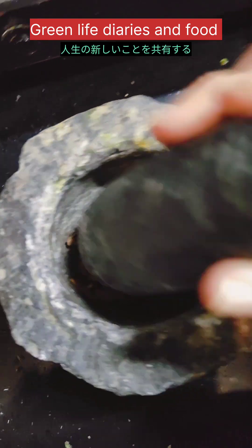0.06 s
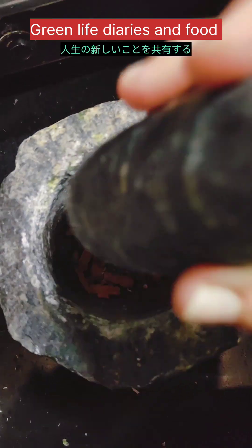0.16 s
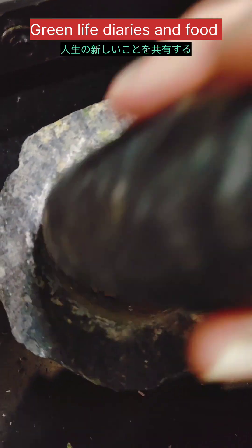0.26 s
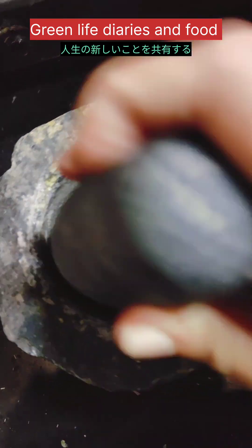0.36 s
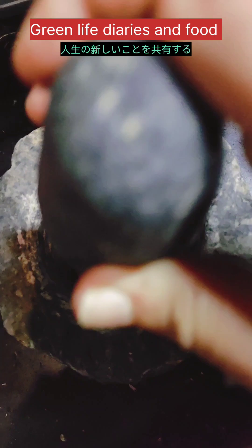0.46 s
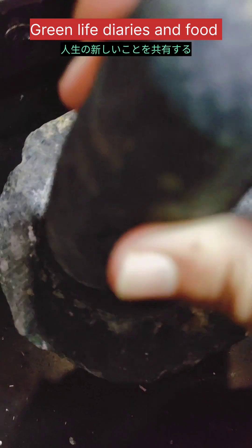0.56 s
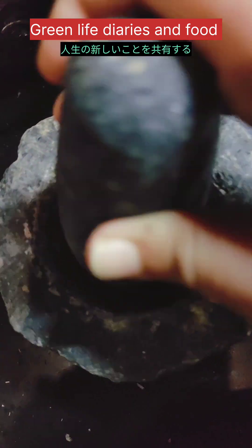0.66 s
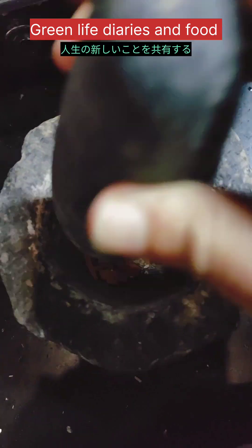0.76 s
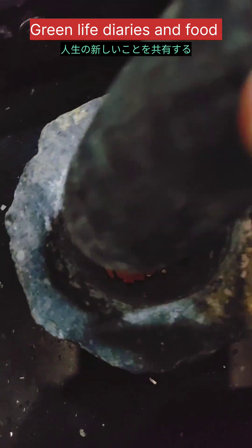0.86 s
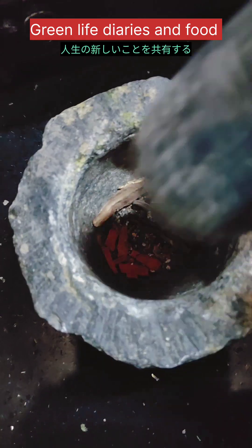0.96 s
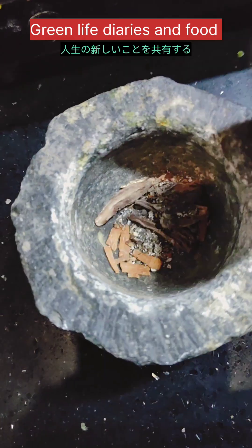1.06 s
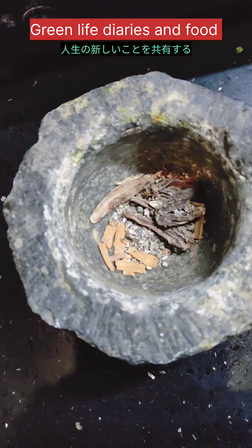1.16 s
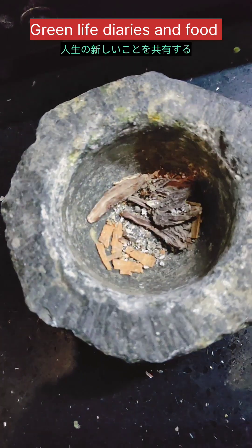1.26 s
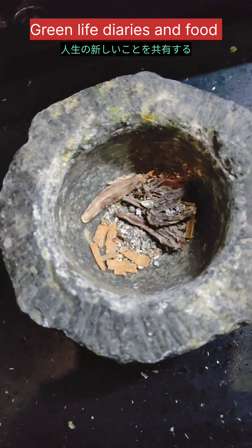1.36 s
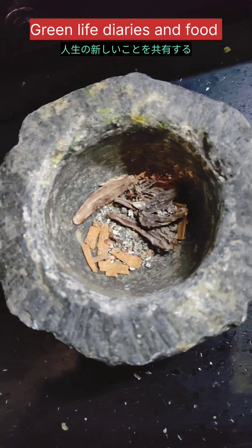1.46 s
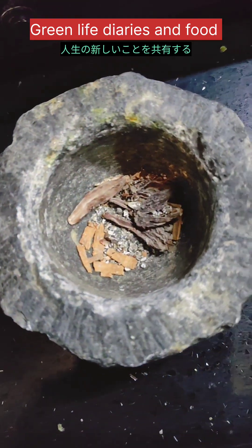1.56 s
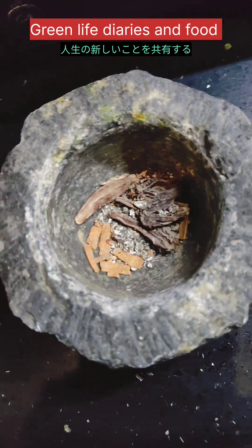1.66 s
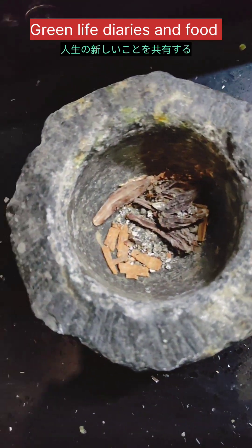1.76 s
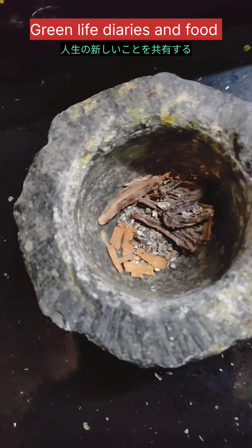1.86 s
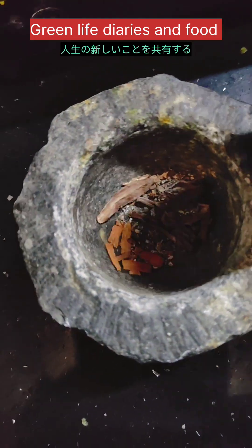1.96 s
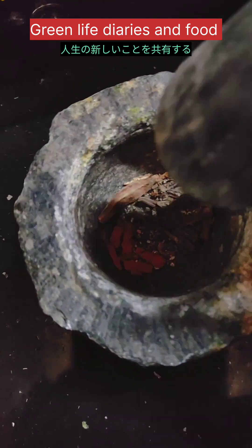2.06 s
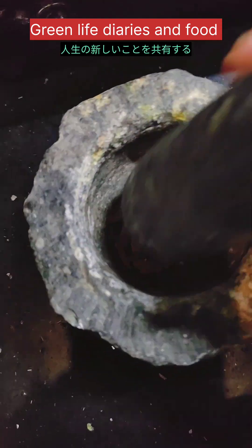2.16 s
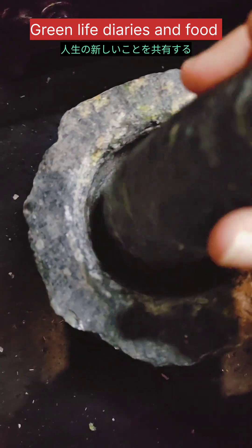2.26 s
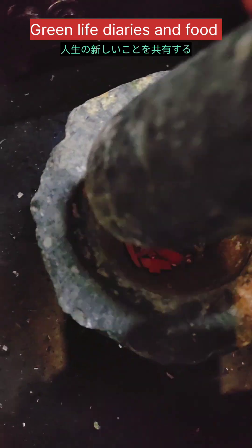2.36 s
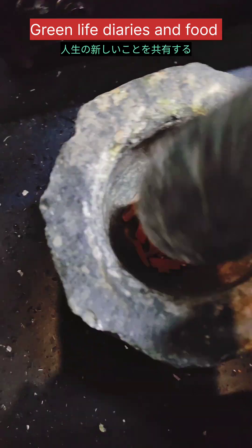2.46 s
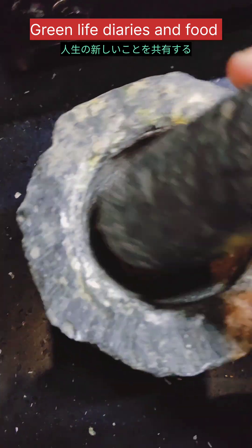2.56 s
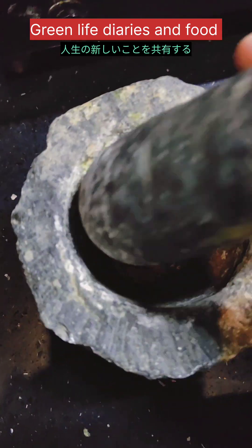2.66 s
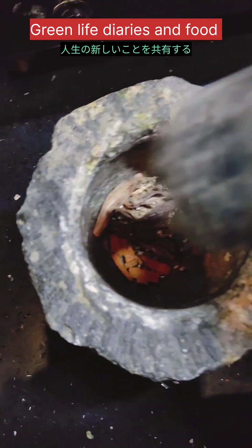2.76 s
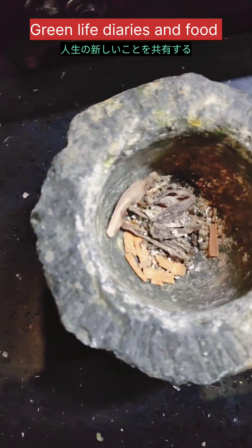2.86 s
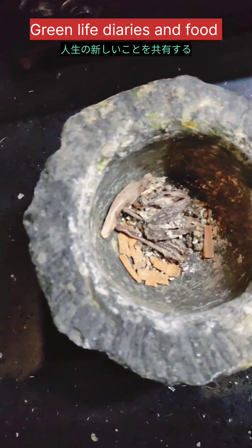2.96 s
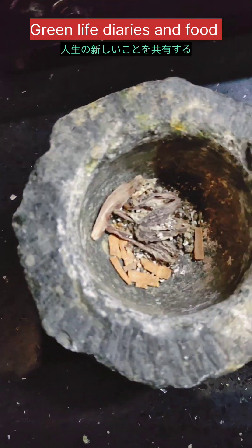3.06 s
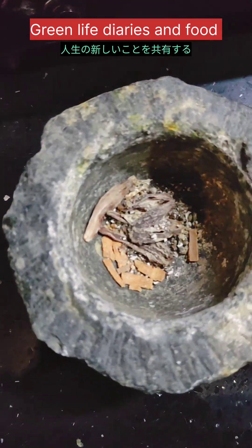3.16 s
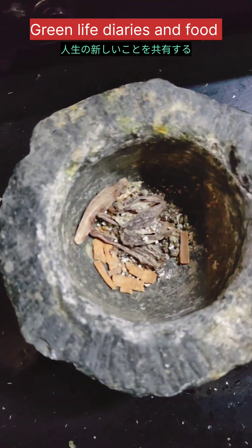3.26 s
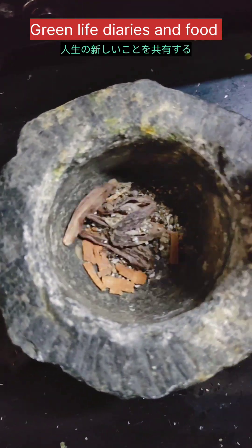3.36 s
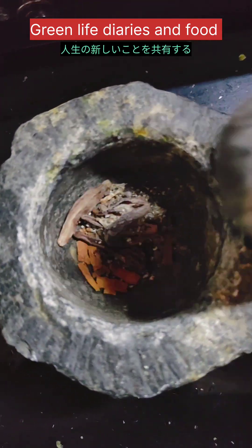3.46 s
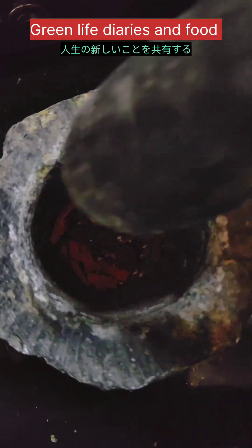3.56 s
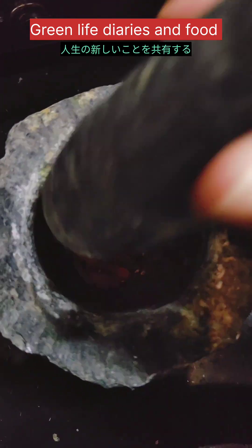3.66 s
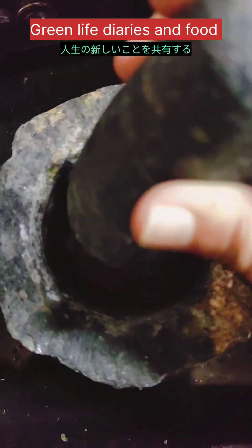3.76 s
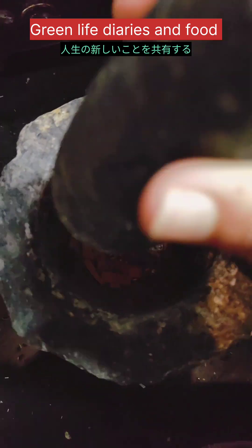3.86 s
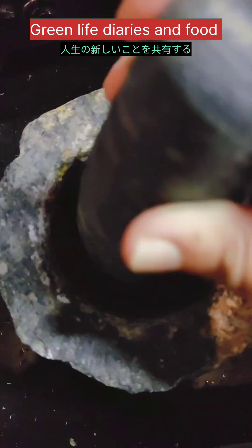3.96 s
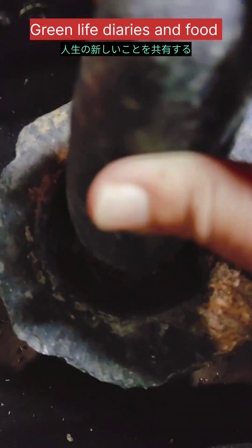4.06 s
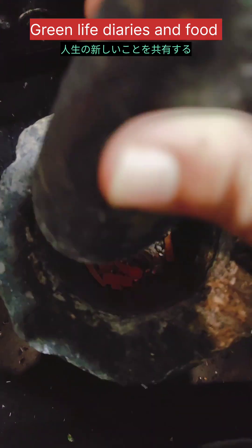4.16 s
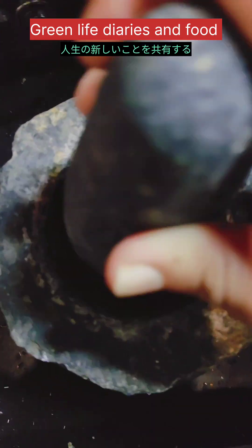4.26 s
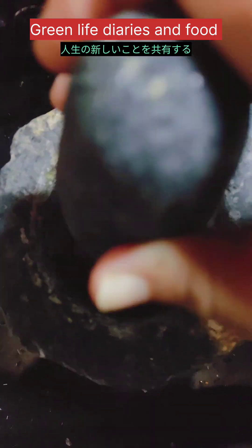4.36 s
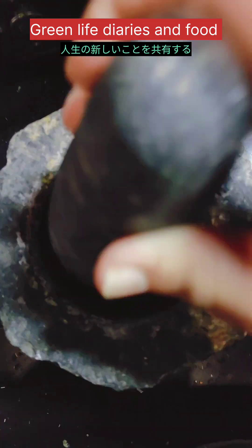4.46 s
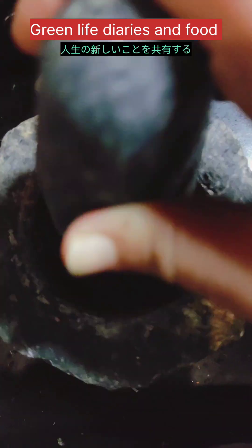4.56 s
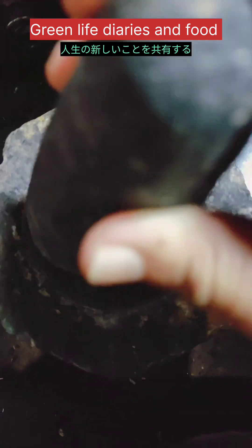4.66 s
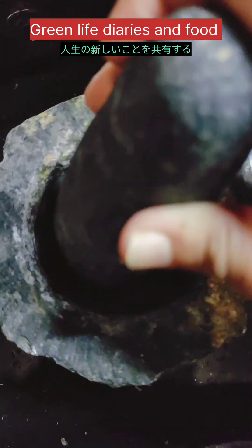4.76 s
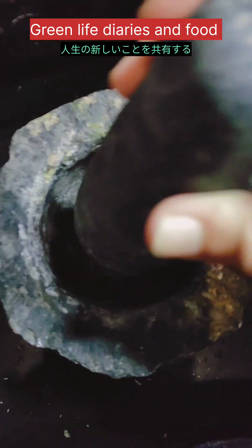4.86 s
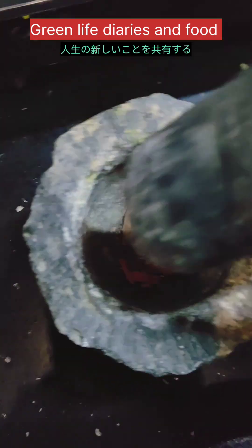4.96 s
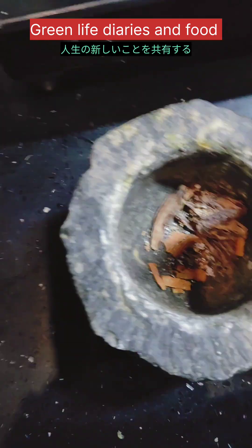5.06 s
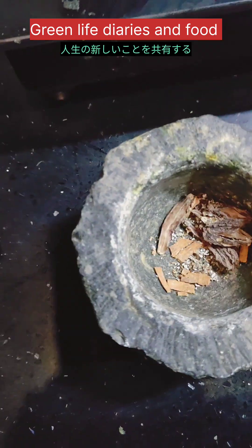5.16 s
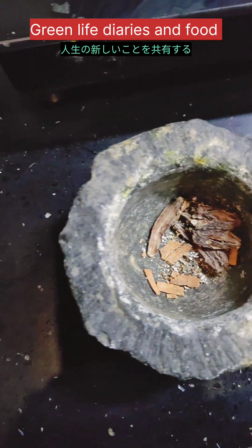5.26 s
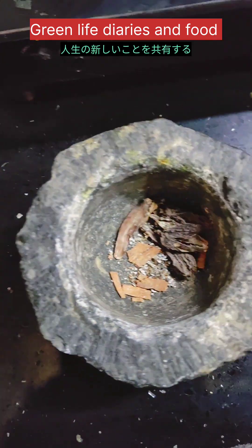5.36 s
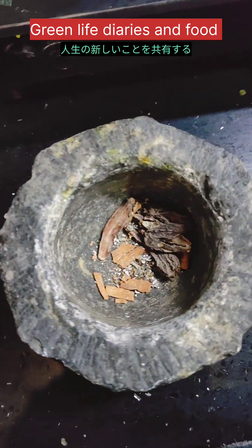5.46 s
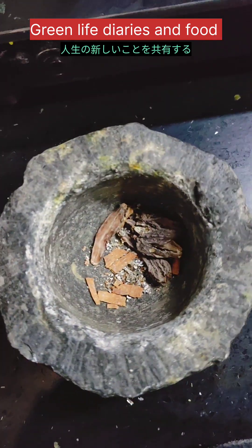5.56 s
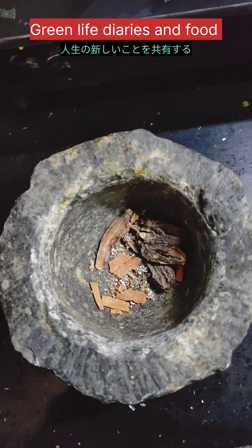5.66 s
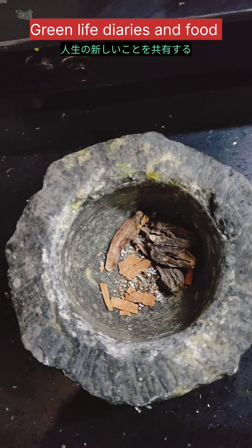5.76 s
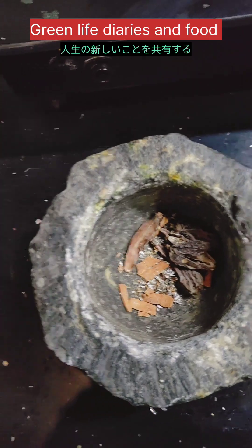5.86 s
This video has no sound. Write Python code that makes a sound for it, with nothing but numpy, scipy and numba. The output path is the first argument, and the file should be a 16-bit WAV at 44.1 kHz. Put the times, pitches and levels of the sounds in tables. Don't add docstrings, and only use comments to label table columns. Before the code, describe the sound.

Close stone-on-stone knocks, deep counter thuds and brittle spice crunches come in uneven bursts with pauses, in a small hard kitchen with a running fan.

```python
import sys
import numpy as np
from scipy import signal
from scipy.fft import rfft, irfft
from scipy.io import wavfile
from scipy.ndimage import uniform_filter1d, minimum_filter1d
from numba import njit

SR = 44100
rng = np.random.default_rng(int(sys.argv[2]) if len(sys.argv) > 2 else 0)


def convert_level_to_amplitude(level_db):
    exponent = np.asarray(level_db, float) / 20
    return 10 ** exponent


def pcm_store(signal):
    levels = np.round(np.clip(np.atleast_2d(signal), -1, 1) * 32767)
    wavfile.write(sys.argv[1], SR, levels.astype(np.int16).T)


N = 261072
HALF = SR // 2
ECHO_RISE_S = 0.004

# [f/Hz, level/dB, time to fade by 60 dB/s]
BOWL = [(483, -5.5, 0.28), (588, -14, 0.26), (881, 4.5, 0.096), (958, 2.5, 0.1), (1182, -16, 0.28),
        (1381, 0, 0.13), (1515, -11, 0.28), (1618, -0.5, 0.05), (1727, -1, 0.073), (2120, 7, 0.035),
        (2280, 11.5, 0.026), (2570, 2, 0.038), (2940, 2, 0.025), (3180, -19.5, 0.083)]


def read(table, hz):
    table = np.array(table)
    return np.interp(np.log(hz + 1), np.log(table[:, 0]), table[:, 1])


def colour(x, table):
    hz = np.fft.rfftfreq(4096, 1 / SR)
    cepstrum = irfft(np.log(convert_level_to_amplitude(read(table, hz))))
    cepstrum[1:2048] *= 2
    cepstrum[2049:] = 0
    response = irfft(np.exp(rfft(cepstrum)))
    return signal.fftconvolve(x, response)[:len(x)]


def unit(x):
    return x / np.sqrt(np.mean(x ** 2))


def diffuse(count):
    # [f/Hz, likeness/0-1]
    likeness = [(60, 1), (130, 0.79), (290, 1), (640, 0.47), (1400, 0.05), (3000, 0)]
    alike = np.clip(read(likeness, np.fft.rfftfreq(count, 1 / SR)), 0, 1)
    noise = rfft(rng.standard_normal((2, count)))
    mid, side = noise * np.sqrt([1 + alike, 1 - alike]) / np.sqrt(2)
    return irfft([mid + side, mid - side], count)


def ports(pair, table, count):
    left = np.roll(colour(pair[0], table), count)
    return np.array([left, pair[1]])


def modes(table, spread, scatter_db):
    hz, db, t60 = np.transpose(table)[..., None]
    t = np.arange(HALF) / SR
    luck, detune = rng.standard_normal((2, len(table), 1))
    level = convert_level_to_amplitude(db + scatter_db * luck - 60 * t / t60)
    return np.sum(level * np.sin(2 * np.pi * hz * (1 + spread * detune) * t), 0)


def fading(colour_db, rise_s, stretch):
    # [f/Hz, time to fade by 60 dB/s]
    echo_t60 = [(200, 0.25), (1000, 0.26), (3000, 0.24), (7000, 0.15)]
    t = np.arange(HALF) / SR
    noise = np.array([colour(v, colour_db) for v in diffuse(count=HALF)])
    hz = np.fft.rfftfreq(HALF, 1 / SR)
    out = 0
    for k, (_, t60) in enumerate(echo_t60):
        share = read([(f, j == k) for j, (f, _) in enumerate(echo_t60)], hz)
        band = irfft(rfft(noise) * share)
        patchy = unit(uniform_filter1d(rng.standard_normal(len(t)), size=260))
        out = out + band * convert_level_to_amplitude(2.1 * patchy - 60 * t / (t60 * stretch))
    return out / noise.std() * (1 - np.exp(-(t / rise_s) ** 2))


def add(out, s, x):
    i = int(s * SR)
    out[:, i:i + x.shape[-1]] += x[..., :N - i]


def fan():
    # [f/Hz, level/dB per Hz]
    rush_db = [(35, -11), (60, -13.5), (125, -18.5), (200, -5.5), (300, 1), (400, -5), (1050, -1.5),
               (1400, -4.5), (1850, -10), (2200, -6.5), (2560, -8), (2900, -18), (3400, -26), (4000, -63.5)]
    # [f/Hz, width/Hz, level/dB rms]
    duct = [(554, 52, -50), (693.6, 27, -52), (1030, 64, -57), (1301, 6.5, -48.5), (2511, 86, -54.5)]
    # [f/Hz, level/dB per Hz]
    hiss_db = [(3000, -30), (3500, 8.5), (4700, 8), (5200, -1), (5600, -7), (7000, -11.5), (7900, 6.5),
               (8600, -11.5), (9000, -10), (11300, -22), (12000, -6), (15000, -28), (15800, -23),
               (16200, -46)]
    t = np.arange(N) / SR
    out = convert_level_to_amplitude(-38.5) * unit(np.array([colour(v, rush_db) for v in diffuse(count=N)]))
    for hz, width, db in duct:
        b, a = signal.iirpeak(hz, hz / width, fs=SR)
        once = signal.lfilter(b, a, diffuse(count=N))
        out = out + convert_level_to_amplitude(db) * unit(signal.lfilter(b, a, once))
    blade_hz = 286.5
    hum = np.sqrt(2) * np.sin(2 * np.pi * blade_hz * t)
    hiss = unit(np.array([colour(v, hiss_db) for v in diffuse(count=N)]))
    uncover_s, uncover_takes_s = 4.3, 0.89
    hiss_level = np.interp(t, [uncover_s, uncover_s + uncover_takes_s], [-68, -62])
    return out + convert_level_to_amplitude(-45) * hum + convert_level_to_amplitude(hiss_level) * hiss


def rings():
    # [t/s, f/Hz, level/dB, swell/ms]
    lifts = [
        (.1555, 8280, -33.5, 2.2),
        (0.305, 8260, -41.5, 8.8),
        (2.663, 8340, -33.5, 1.9),
        (2.70, 8250, -34, 28),
        (.51, 4800, -46, 20),
        (4.17, 4750, -44, 20),
        (4.43, 4780, -44.5, 22),
        (4.935, 4760, -36.5, 29),
        (5.651, 8300, -51, 19),
    ]
    cycles = 1130
    out = np.zeros((2, N))
    t = np.arange(HALF) / SR
    for s, hz, db, ms in lifts:
        late = np.maximum(t - ms / 1000, 0)
        swell = np.minimum(1000 * t / ms, 1)
        add(out, s, convert_level_to_amplitude(db - 60 * late * hz / cycles) * swell * np.sin(2 * np.pi * hz * t))
    return out


def crunches():
    # [t/s, level/dB, crumbling/dB, brightness/dB per octave]
    breaks = [(0.157, -42, -13, 0.1), (0.1726, -21.5, -8.5, 2), (0.2457, -32, -7, -0.5),
              (0.4907, -23, -4.5, -1), (0.7775, -30.5, 0, -2), (2.3086, -41.5, -8, -1.5),
              (2.329, -25.5, -1.5, -8.5), (2.346, -19, -17, 4), (2.6756, -25, -2.5, -12.5),
              (2.7074, -38, -19, -1.5), (3.873, -11, -18.5, -1), (3.9409, -38.5, -11, -3),
              (4.152, -27.5, -2.5, -8.5), (4.3982, -52, 10, -5), (4.42, -30, 2.5, -5.5),
              (4.493, -36.5, -8, 0), (4.6693, -17.5, -11, 3), (4.799, -49, -15, 6), (4.808, -45.5, -14, -8),
              (4.9215, -28.5, 3, -7), (4.9765, -30, -7, -7), (5.044, -39, -17, -9),
              (5.5695, -43.5, 6.5, -13), (5.6545, -60, -8, 2)]
    # [t/s, level/dB, swell/ms, crumbling/dB]
    rustles = [
        (.225, -60, 22, -12),
        (2.272, -49, 35, -20),
        (2.05, -62, 32, 0),
        (3.629, -58, 43, -2),
        (4.699, -47.5, 50, -5),
        (5.09, -50.5, 36, 8),
    ]
    # [f/Hz, level/dB per Hz]
    crumb = [(2060, -8), (3500, -8.5), (3810, -16.5), (4810, -11.5), (6690, -18.5), (8500, -3.5),
             (9610, -12), (12500, -16), (15500, -24), (16500, -18)]
    out = np.zeros((2, N))
    t = np.arange(HALF) / SR
    scale = colour(rng.standard_normal(SR), crumb).std()
    cracks = [(s, db, 2.75, more_db, 0.26 + 0.005 * more_db, tilt_db) for s, db, more_db, tilt_db in breaks]
    drags = [(s, db, ms, more_db, 0.55, -6) for s, db, ms, more_db in rustles]
    for s, db, ms, tail_db, t60, tilt_db in cracks + drags:
        patchy = unit(uniform_filter1d(rng.standard_normal(len(t)), size=400))
        fade_db = 45 * t / t60 + 60 * (t / t60) ** 2
        tail = convert_level_to_amplitude(tail_db + 3 * patchy - fade_db) * np.minimum(1000 * t / ms, 1)
        burst = np.exp(-(1500 * t / ms - 1.9) ** 2)
        snaps = convert_level_to_amplitude(1.6 * rng.exponential(size=len(t))) * (rng.random(len(t)) < 0.05)
        grains = uniform_filter1d(snaps, size=12) + 0.3
        noise = [[0.2, 0.23], [0.18, 0.95]] @ diffuse(count=len(t))
        sound = (burst + tail) * unit(grains) * noise
        tone = [(hz, level_db + tilt_db * np.log2(hz / 8000)) for hz, level_db in crumb]
        add(out, s, convert_level_to_amplitude(db - 3.5) / scale * np.array([colour(v, tone) for v in sound]))
    return out


def clacks():
    # [t/s, level/dB, room share/dB, sharp tick/dB]
    hits = [(0.1553, -1.5, -6, -9.5), (0.3024, -9.5, -7.5, 8.5), (0.331, -13, -7.5, -14),
            (2.308, -2, -5.5, -5.5), (2.328, 1, -4.5, -9), (2.664, -4, -3, -2.5), (2.679, 1, -5.5, -11),
            (2.695, -2.5, -8, -10), (2.729, -4.5, -5, -18), (4.396, -3, -6, -16.5), (4.439, -24, -2, -14),
            (4.811, -10.5, -13.5, -9.5), (4.925, 2, -6, -6.5), (4.959, -1, -7.5, -21),
            (5.566, -1, -3.5, -8.5), (5.591, -14, -11, -19), (5.6504, -2, -9.5, -18)]
    # [f/Hz, level/dB per Hz]
    echo = [(88, -9.5), (150, -16.5), (325, 0.5), (455, 2.5), (648, -10.5), (737, 0.5), (1360, 2.5),
            (1810, -4), (2270, -5), (3920, -26), (7000, -29.5), (9100, -69), (15400, -120)]
    out = np.zeros((2, N))
    t = np.arange(HALF) / SR
    contact = signal.butter(4, 4500, fs=SR, output="sos")
    after = t - 0.002
    tick = np.exp(-(after / 0.00048) ** 2) * np.cos(2 * np.pi * 2700 * after)
    tick = tick + convert_level_to_amplitude(-12) * np.exp(-(after / 0.00005) ** 2)
    gaps = np.diff(np.transpose(hits)[0], prepend=-1)
    for (s, db, room_db, tick_db), gap in zip(hits, gaps):
        hz, pan_db = (1200, -13) if gap < 0.052 else (880, 6)
        knock = np.exp(-(after * hz / 0.55) ** 2) * np.sin(2 * np.pi * hz * (t - 0.00163))
        bowl = convert_level_to_amplitude(-17) * modes(BOWL, 0.0069, 5.1) * np.minimum(t / ECHO_RISE_S, 1) ** 2
        direct = (convert_level_to_amplitude(3) * knock + bowl) * convert_level_to_amplitude([[pan_db], [0]]) + convert_level_to_amplitude(tick_db + 6) * tick
        room = convert_level_to_amplitude(room_db - 0.5) * fading(echo, ECHO_RISE_S, 1.0)
        add(out, s - 0.001, convert_level_to_amplitude(db) * signal.sosfilt(contact, room - direct))
    return out


def thuds():
    # [t/s, level/dB, shudder/dB, push/ms]
    blows = [(0.176, -8.5, -10, 3.55), (0.332, -28.5, -18, 1.5), (0.495, -7.5, -8.5, 2.36),
             (0.78, -7, -8.5, 2.37), (2.312, -18.5, -3.5, 2.5), (2.349, -10.5, -8.5, 3.6),
             (2.691, -21, -19, 1.3), (3.875, -7, -12, 2.12), (4.157, -5.5, -7, 1.15),
             (4.424, -5.5, -11.5, 1.73), (4.673, -7.5, -8.5, 1.7), (4.923, -8.5, -6, 0.73),
             (5.646, -27.5, -5, 2.3)]
    # [f/Hz, level/dB, time to fade by 60 dB/s]
    body_modes = [(95, -4.5, 0.046), (248, 0.5, 0.059), (238.9, -1.5, 0.17), (283, -23, 0.33),
                  (317.8, -6, 0.24), (332.2, -5, 0.15), (357, -19.5, 0.28), (448, -12.5, 0.091),
                  (458.4, 9.5, 0.043), (563, -20, 0.16)]
    # [f/Hz, level/dB, time to fade by 60 dB/s]
    slab = [(45.5, 1, .26), (64, -3, .2)]
    # [f/Hz, level/dB per Hz]
    rattle = [(240, -8.5), (400, -5.5), (781, -9), (1590, -12), (1830, -17.5), (2540, -19.5), (3040, -29),
              (4840, -39.5), (6000, -52), (7800, -68), (13200, -120)]
    out = np.zeros((2, N))
    t = np.arange(HALF) / SR
    linger_hz, linger_db, linger_t60 = 55.8, -31.5, 1.1
    linger = convert_level_to_amplitude(linger_db - 60 * t / linger_t60) * np.sin(2 * np.pi * linger_hz * t) * np.cos(np.pi * t)
    for s, db, shudder_db, ms in blows:
        boom_db = (-16 if db > -22 else -37.5) - db
        push = np.hanning(int(ms * SR / 1000))
        body = np.convolve(modes(body_modes, 0.0066, 0.67), push / push.sum())[:HALF]
        body = body * (1 - np.exp(-(t / 0.0024) ** 2))
        boom = linger
        for mode in slab:
            rise = 1 - np.exp(-(t * mode[0] / 1.4) ** 2)
            boom = boom + rise * modes([mode], 0.0083, 0.97)
        bowl = (1 - np.exp(-(t / 0.008) ** 2)) * modes(BOWL, 0.004, 2.4)
        shudder = fading(rattle, 3 * ECHO_RISE_S, 1.122) + convert_level_to_amplitude(-6) * bowl
        blow = convert_level_to_amplitude(shudder_db) * shudder - body / abs(body).max() - convert_level_to_amplitude(boom_db) * boom
        add(out, s, convert_level_to_amplitude(db + 8) * blow)
    return out


def scene():
    # [f/Hz, left minus right/dB]
    near_ports = [(60, 1.5), (110, 1.5), (200, 1.2), (380, -2), (700, -6.5), (1290, -9), (2380, -14),
                  (4400, -15), (6500, -26), (8300, -36), (10000, -24), (13500, -6), (15000, -5)]
    # [f/Hz, left minus right/dB]
    fan_ports = [(60, -4.5), (110, -16), (200, -1.5), (380, -5.5), (700, -10.5), (1290, -13), (2380, -25.5),
                 (4400, -19), (8120, -26), (15000, 14)]
    pounding = thuds() + clacks() + rings() + crunches()
    return ports(pounding, near_ports, count=1) + ports(fan(), fan_ports, count=8)


@njit
def squeeze(x, top, ratio, release):
    gain = np.empty(len(x))
    peak = 0.
    for i in range(len(x)):
        peak = max(abs(x[i]), peak * release)
        gain[i] = (top / max(peak, top)) ** (1 - 1 / ratio)
    return gain


def roll_off(x):
    return signal.sosfilt(signal.butter(12, 16610, fs=SR, output="sos"), x)


def record(dry):
    dry = signal.sosfilt(signal.butter(2, 38, "high", fs=SR, output="sos"), dry)
    dry = signal.sosfilt(signal.ellip(8, 0.2, 50, 15900, fs=SR, output="sos"), dry)
    limit_db, ratio, release_s = -1, 12.0, 0.015
    release = np.exp(-1 / (release_s * SR))
    gain = [squeeze(np.roll(v, -44), convert_level_to_amplitude(limit_db), ratio, release) for v in dry]
    gain = uniform_filter1d(minimum_filter1d(gain, size=88), size=88)
    return roll_off(np.clip(dry * gain, -1, 1))


dry = scene()
out = record(dry)
pcm_store(out)
```